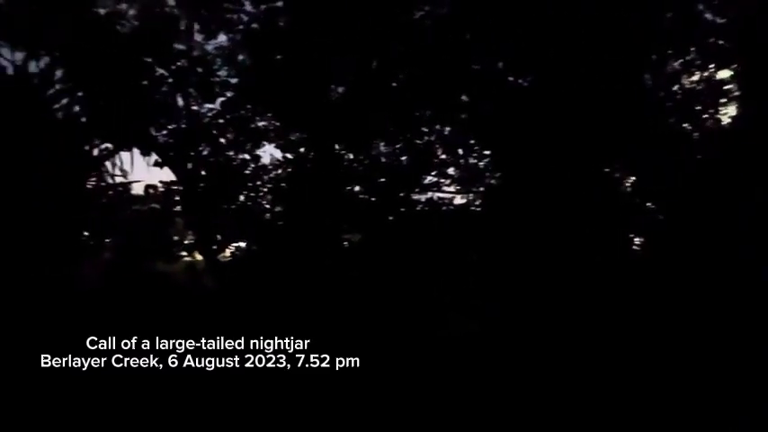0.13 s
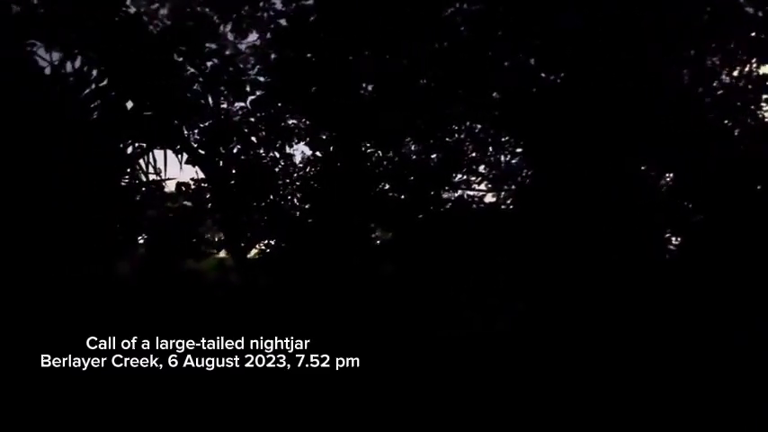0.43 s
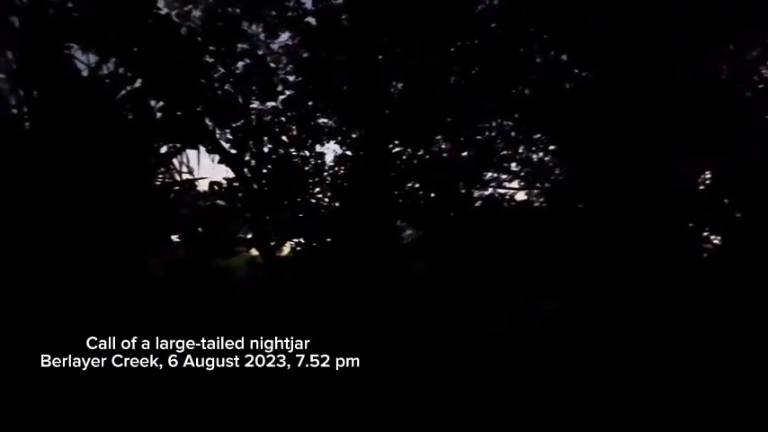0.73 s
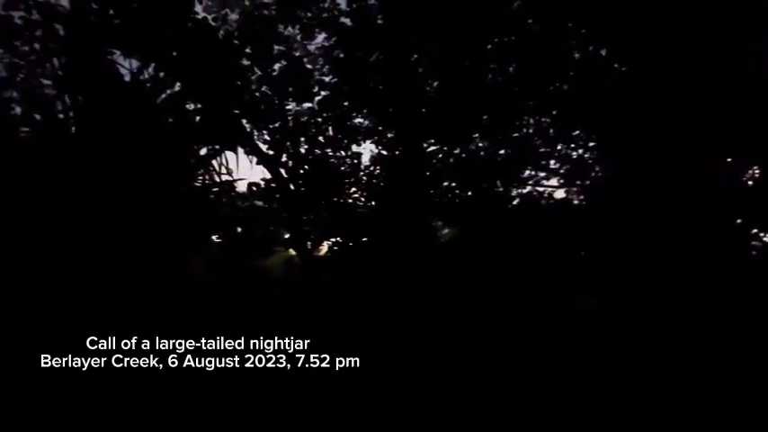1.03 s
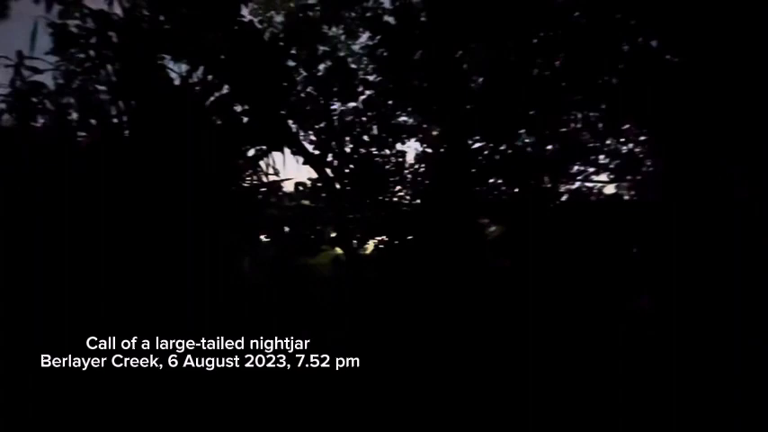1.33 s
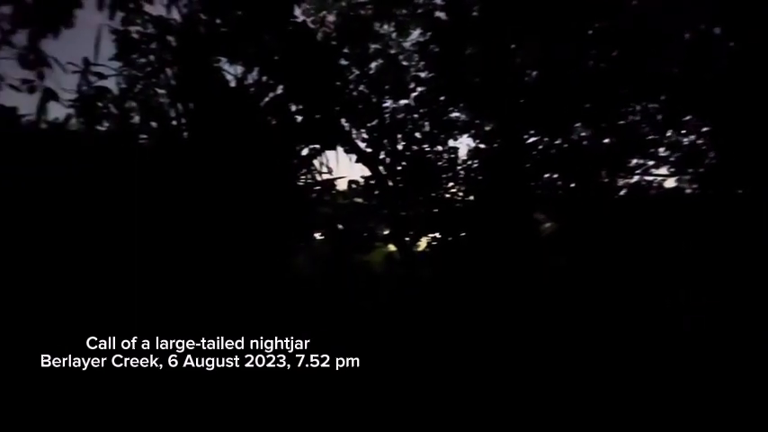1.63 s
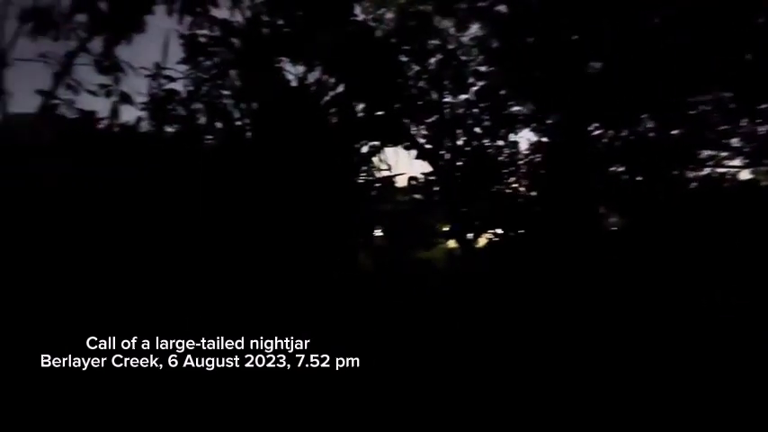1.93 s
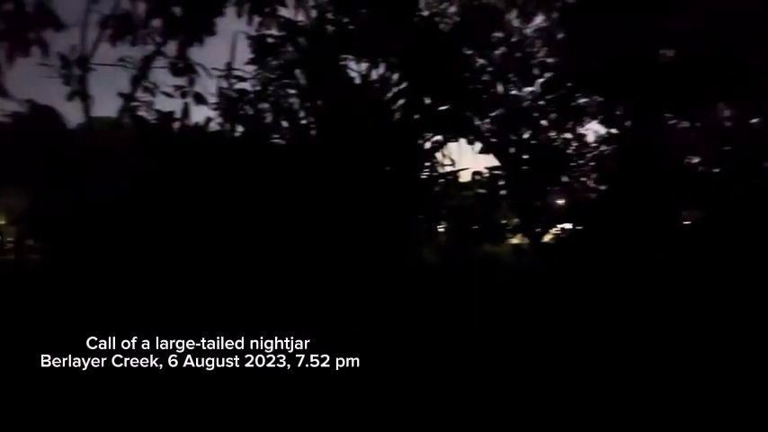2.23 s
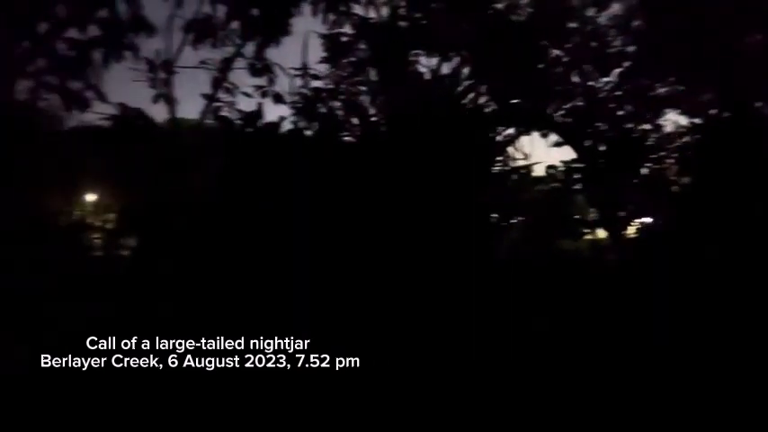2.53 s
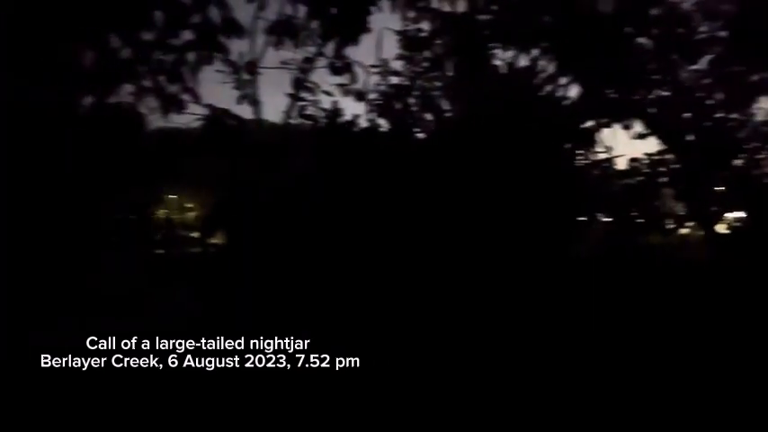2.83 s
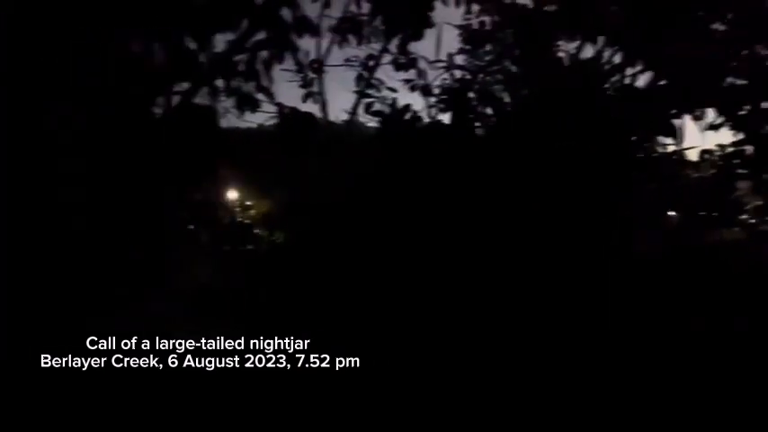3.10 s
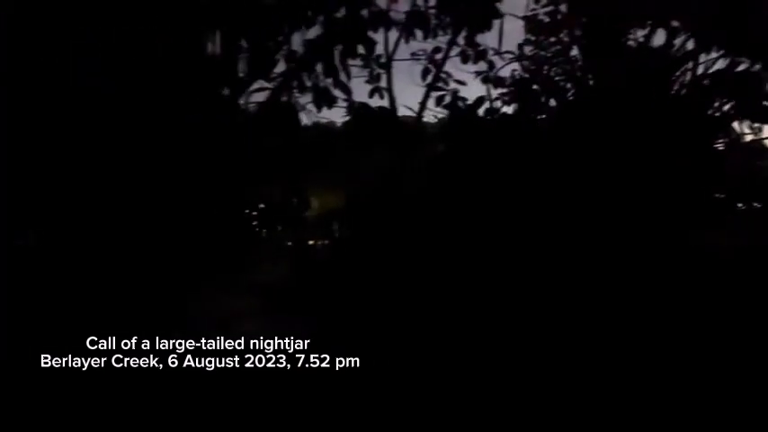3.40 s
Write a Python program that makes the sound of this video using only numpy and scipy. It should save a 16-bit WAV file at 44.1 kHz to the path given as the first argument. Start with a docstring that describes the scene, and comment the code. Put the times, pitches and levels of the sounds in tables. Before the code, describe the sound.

A nearby nightjar knocks twice, early and again after a second, echoing among trees; a frog creaks briefly beforehand. Deep engine throb and far traffic continue, with faint insects, through a handheld phone outdoors at dusk.

```python
"""A wood at dusk near water: a nightjar close by knocks twice, and fainter knocks fall around it.
Each knock is a falling whistle; the close ones turn to a purr. A frog creaks once, as clicks ringing modes.
Crickets rasp in overlapping phrases of pulsed noise, amid faint rustles; a cicada chorus hisses high up.
A big slow engine throbs as low wavering lines over the shaped noise of far traffic.
A hand-held phone with two ports hears it all through the scatter of the wood; a finger taps its case once."""
import sys
import numpy as np
from scipy import signal
from scipy.fft import rfft, irfft
from scipy.io import wavfile
from scipy.ndimage import uniform_filter1d

SR = 44100
rng = np.random.default_rng(int(sys.argv[2]) if len(sys.argv) > 2 else 0)


def unload_wav(signal):
    """Save mono or channel-first audio to the path in sys.argv[1] as 16-bit WAV at rate SR, clipped to [-1, 1]."""
    wavfile.write(
        sys.argv[1],
        SR,
        np.round(np.clip(np.atleast_2d(signal).T, -1, 1) * 32767).astype(np.int16),
    )


N = 156996

# Nightjar knocks, close and faint: start_s, level_db, pitch_factor, purr_share (0-1)
KNOCKS = [(.685, -15.5, 0.99, 0.86), (1.351, -16.5, 0.99, 1), (.300, -38, 0.95, 0.1),
          (1.085, -36.5, 0.9, 0), (1.840, -37, 0.99, 0)]
# Shape of one knock, a falling chop then uneven puffs: time_s, pitch_hz (before the factor), relative_level_db
KNOCK_SHAPE = [(0, 1950, -21), (.003, 1964, -8), (.008, 1670, -5), (.012, 1488, 1.5), (.019, 1101, -5),
               (.025, 883, -7.5), (.031, 702, -12), (0.035, 664, -29), (.041, 720, -5), (.048, 832, -5),
               (.062, 854, -8), (.069, 812, -26), (.082, 791, -12), (0.093, 854, -6), (.099, 830, -20),
               (.105, 802, -3.5), (.114, 820, -28), (.124, 736, -14), (0.135, 865, -8.5), (.143, 842, -7),
               (.150, 780, -32), (.159, 820, -14), (.166, 804, -24), (.174, 780, -40)]
OCTAVE_DB, OCTAVE_FADE_S = -12, 0.088
PURR_FROM_S, PURR_ROUGH_HZ, PURR_ROUGH_DB = 0.045, 45, 2.5

# Clicks of the frog's creak: start_s, relative_peak_db, brightness_db_per_octave
FROG_CLICKS = [(0.3335, -15.5, -4), (0.3420, -19, -6), (0.3540, -14, -6), (0.3640, -17, 5),
               (0.3682, -10.5, 5), (0.3748, -11.5, -9), (0.3864, -9.5, 1), (0.4064, -7, 2), (0.4182, -7, 0),
               (0.4272, -12, -13), (0.4400, -20, -14), (0.4520, -22, -10), (0.4610, -30, 3)]
# Modes that each click rings: pitch_hz, relative_level_db, t60_s
FROG_MODES = [(1400, -7, .020), (1880, -10, .010), (2180, -3, .015), (2480, -1, .014), (2640, -6, .009),
              (2820, -1, .015), (3050, -5, .011), (3350, -12, .008), (3850, -20, .008)]
FROG_RISE_S, FROG_DB = 0.0009, -5.5
FROG_WET_DB = -7  # further gain on the way into the wood

# Modes of the tapped case: pitch_hz, relative_level_db, t60_s
TAP_MODES = [(480, -5, .010), (780, 0, .011), (1100, -2, .009), (1500, -10, .005), (2200, -18, .005),
             (2900, -18, .005), (3700, -19, .005)]
TAP_S, TAP_RISE_S, TAP_LEFT_DB, TAP_RIGHT_DB = 2.7564, 0.0014, -20, -14

# Cricket phrases, then one low, wide rustle as the last row:
# start_s, length_s, pitch_hz, width_hz, level_db (before swell and pulse)
CRICKETS_AND_RUSTLE = [(-.3, 0.35, 4630, 170, -59), (0.45, 0.62, 4730, 200, -61.5),
                       (0.696, 0.6, 4990, 180, -64.5), (1.537, 0.45, 4730, 160, -61),
                       (1.846, 0.49, 4970, 143, -61), (2.522, 0.5, 4760, 190, -61.5),
                       (2.9, 0.58, 4950, 140, -71), (3.402, 0.64, 4670, 170, -58.5),
                       (1.933, 0.57, 3560, 553, -61.5)]
# A faint airy rustle, perhaps leaves or a hand: start_s, length_s, centre_hz, width_hz, level_db (as above)
AIRY_RUSTLE = [(0.154, .45, 5400, 1110, -63)]
CRICKETS = CRICKETS_AND_RUSTLE[:-1]
RUSTLES = CRICKETS_AND_RUSTLE[-1:] + AIRY_RUSTLE
PULSES_HZ = 78

# Low firing lines of the engine: pitch_hz
ENGINE_LINES = [50., 59.15, 62.5, 75., 87.5]
# Mean level of each of those lines: rms_db (before waver and beat fade)
ENGINE_LEVELS = [-31.5, -24, -23, -29.5, -29.5]
# Gain of the two close lines that beat: time_s, gain_db
BEAT_FADE = [(0, 2), (2.3, 0), (2.6, -9), (2.9, -3), (3.25, 0), (3.56, -4.5)]
ENGINE_WAVER_DB = 0.8
IN_STEP_S = 0.61  # a moment when the lines swell together

# Spectrum of the far traffic: frequency_hz, relative_density_db (per hertz)
TRAFFIC = [(20, -47), (32, -17), (48, -3), (62, -1), (80, -3.5), (110, -12.5), (170, -15), (260, -23),
           (400, -28), (900, -34), (1500, -44), (1750, -49), (2600, -59.5), (3100, -54.5), (4000, -62.5),
           (4800, -55.5), (5600, -68.5), (6800, -56), (7400, -67), (8000, -86), (14000, -94)]
# Spectrum of the cicada chorus: frequency_hz, relative_density_db (per hertz)
CICADAS = [(6500, -61), (7400, -8.5), (8200, -14), (9100, 2.5), (10200, -5.5), (11500, -9.5),
           (13000, -15.5), (13900, -29)]
TRAFFIC_DB, CICADAS_DB = -20.5, -40  # rms at the ports, before their colour

# Echoes from big trunks: delay_s, left_db, right_db (relative to the leaf scatter)
TRUNKS = [(.009, -5, -2), (0.02, -13, -16), (0.034, -11, -10.5), (0.046, -14, -14), (0.073, -18, -23),
          (.096, -30, -26), (.13, -27, -25)]
WOOD_T60_S, WOOD_FIRST_S, TRUNK_BLUR_S = 0.54, 0.0021, 0.0022
WOOD_DB = 1.5  # bird send into the wood
WOOD_LIKE = 0.46  # share of scatter power common to both ports
WOOD_GRAIN_DB, WOOD_BASS_HZ = 2.5, 1215

# The phone's two ports: frequency_hz, left_minus_right_db, left_lead_rad, background_likeness (limited to 0-1)
PORTS = [(60, 0.7, 0, 1), (129, 0.3, 0.4, 0.96), (259, 1, 0.05, 0.82), (378, 2.5, 1.23, 0.39),
         (494, 1, -1.25, 0.46), (770, -1.5, -2, 0.64), (1540, -3.5, -1.5, 0.4), (1630, -4.5, -2, 1),
         (1850, 4.5, 0.9, 0.26), (2370, 1.5, -0.24, 0.45), (4320, 5, 1.5, 0.5), (4900, 6, 1, 0.4),
         (5500, 1.5, -1, 0.4), (6760, 3, -2, 0.4), (7400, 4, -2.5, 1), (7710, -3.5, -3, 0.92),
         (8010, -0.5, -3, 1.05), (8915, 0, -3.5, 0.94), (10360, -0.5, -5.0, 0.93), (11100, 0, -7, 0.98),
         (13000, 0, -5.5, 1)]
TOP_HZ = 13650


def undb(db):
    """Decibels to amplitude gain."""
    return 10 ** (np.asarray(db) / 20)


def level(x, db):
    """Set the rms level."""
    return x * undb(db) / np.sqrt(np.mean(x ** 2))


def walk(rate):
    """Random control of unit spread: values held at about this rate (Hz), then smoothed twice."""
    hold = int(SR / rate)
    steps = np.repeat(rng.standard_normal(N // hold + 1), hold)
    x = uniform_filter1d(uniform_filter1d(steps, hold), hold)[:N]
    return x / x.std()


def on_hz(table, col):
    """A table column at every FFT bin, interpolated along log frequency."""
    tab = np.array(table)
    bins_hz = np.arange(N // 2 + 1) * SR / N
    return np.interp(np.log(bins_hz + 1), np.log(tab[:, 0]), tab[:, col])


def share_noise(both, own, like):
    """Mix common and own noise so that the share of common power is like."""
    return np.sqrt(like) * both + np.sqrt(1 - like) * own


def ring(blows, modes, rise):
    """Soft blows ring decaying modes, each with slightly different levels, pitches and phases."""
    out, t = np.zeros(N), np.arange(2000) / SR
    hz, db, t60 = np.array(modes).T[:, :, None]
    chances = rng.standard_normal((len(blows), 3, len(modes), 1))
    for (at, peak, bright), chance in zip(blows, chances):
        mode_db = db + bright * np.log2(hz / hz.mean()) + 1.5 * chance[0]
        mode_hz = hz * (1 + .015 * chance[1])
        tones = np.cos(2 * np.pi * mode_hz * (t - rise) + .3 * chance[2])
        decay = np.exp(-np.log(1000) * t / t60)
        body = (undb(mode_db) * tones * decay).sum(axis=0)
        body = body * np.sin(np.pi / 2 * np.clip(t / rise, 0, 1)) ** 2
        out[int(at * SR):][:len(t)] += undb(peak) * body / np.abs(body).max()
    return out


def nightjars():
    """A whistle drops fast and dips; in close knocks it purrs on, rough and low, with some octave."""
    out, t = np.zeros(N), np.arange(N) / SR
    shape_s, shape_hz, shape_db = np.array(KNOCK_SHAPE).T
    for start, db, pitch, purr in KNOCKS:
        wobble, shake = walk(120), walk(150)
        u = t - start
        late = np.clip((u - PURR_FROM_S) / 0.015, 0, 1)
        hz = pitch * np.interp(u, shape_s, shape_hz) + PURR_ROUGH_HZ * late * wobble
        phase = 2 * np.pi * np.cumsum(hz * (u > 0)) / SR
        share = 1 - (1 - purr) * np.clip(u / 0.046, 0, 1)
        puffs_db = np.interp(u, shape_s, shape_db, left=-200, right=-200)
        env = undb(db + puffs_db + PURR_ROUGH_DB * late * shake) * share
        octave_rise = np.clip((u - .025) / 0.026, 0, 1)
        octave_fade = np.exp(-np.maximum(u - .06, 0) / OCTAVE_FADE_S)
        octave = undb(OCTAVE_DB) * octave_rise * octave_fade * np.sin(2 * phase)
        out += env * (np.sin(phase) + octave)
    return out


def frog_creak():
    """A run of clicks, each ringing the same short modes with its own brightness."""
    return undb(FROG_DB) * ring(FROG_CLICKS, FROG_MODES, FROG_RISE_S)


def finger_tap():
    """One soft blow rings the case and reaches both ports through it, louder on the right."""
    return ring([(TAP_S, 0, 0)], TAP_MODES, TAP_RISE_S) * undb([[TAP_LEFT_DB], [TAP_RIGHT_DB]])


def pulsed_bands(phrases):
    """Bands of noise that swell, pulse, flicker and fade."""
    out, t = np.zeros(N), np.arange(N) / SR
    bins_hz = np.arange(N // 2 + 1) * SR / N
    pulse = 1 + 0.21 * np.sin(2 * np.pi * PULSES_HZ * t)
    for start, length, hz, width, db in phrases:
        bell = np.exp(-((bins_hz - hz) / width) ** 2)
        band = irfft(rfft(rng.standard_normal(N)) * bell, N)
        swell = np.sin(np.pi * np.clip((t - start) / length, 0, 1)) ** .5
        out += level(band, db) * swell * pulse * undb(2.3 * walk(19))
    return out


def crickets():
    """Rasping phrases: narrow, pulsed bands of noise."""
    return pulsed_bands(CRICKETS)


def rustles():
    """Faint rustles: wider bands of noise with the same pulse."""
    return pulsed_bands(RUSTLES)


def wood(x):
    """Dense grainy scatter from leaves and blurred echoes from clumps of trunks, weak in the bass."""
    t = np.arange(SR) / SR
    fade = np.exp(-np.log(1000) * t / WOOD_T60_S) * (t > WOOD_FIRST_S)
    grain = undb(WOOD_GRAIN_DB * walk(146.7)[:SR])
    both, left, right = rng.standard_normal((3, SR)) * fade * grain
    out = []
    for port, own in enumerate((left, right)):
        response = share_noise(both, own, WOOD_LIKE)
        response = response / np.sqrt(np.sum(response ** 2))  # unit energy
        for row in TRUNKS:
            blur = np.exp(-((t - row[0]) / TRUNK_BLUR_S) ** 2)
            clump = rng.standard_normal(SR) * blur
            response += level(clump, row[1 + port]) / np.sqrt(SR)
        out.append(signal.fftconvolve(x, response)[:N])
    return signal.lfilter(*signal.butter(3, WOOD_BASS_HZ, "high", fs=SR), out)


def engine():
    """Low firing lines waver a little in level and phase; two close ones beat."""
    t = np.arange(N) / SR
    fade = np.interp(t, *np.array(BEAT_FADE).T)
    out = np.zeros(N)
    for hz, db in zip(ENGINE_LINES, ENGINE_LEVELS):
        beats = 55 < hz < 65
        gain = np.sqrt(2) * undb(db + ENGINE_WAVER_DB * walk(2.27) + fade * beats)
        out += gain * np.cos(2 * np.pi * hz * (t - IN_STEP_S) + 0.38 * walk(1.154))
    return out


def wide_noise(table, db, flicker_db):
    """A broad background sound: coloured, flickering noise partly shared by both ports."""
    like = np.clip(on_hz(PORTS, col=3), 0, 1)
    both, left, right = rfft(rng.standard_normal((3, N)) * undb(flicker_db * walk(15)))
    shape = undb(on_hz(table, col=1))
    pair = [irfft(shape * share_noise(both, own, like), N) for own in (left, right)]
    return level(np.array(pair), db)


def far_traffic():
    """Low-heavy noise, almost steady."""
    return wide_noise(TRAFFIC, TRAFFIC_DB, flicker_db=0.1)


def cicada_chorus():
    """High hissing noise that flickers slightly."""
    return wide_noise(CICADAS, CICADAS_DB, flicker_db=0.78)


def ports(left, right):
    """The phone splits level and phase between its ports, half to each in opposite senses."""
    tilt = undb(on_hz(PORTS, col=1) / 2) * np.exp(.5j * on_hz(PORTS, col=2))
    return np.array([irfft(rfft(left) * tilt, N), irfft(rfft(right) / tilt, N)])


def scene():
    """All sources at the two ports; the engine and the tap skip the port colour."""
    birds = nightjars()
    soft = crickets() + rustles()
    frog = frog_creak()
    near = birds + frog + soft
    echo = wood(undb(WOOD_DB) * birds + undb(FROG_WET_DB) * frog + soft)
    tap = finger_tap()
    far = far_traffic() + cicada_chorus()
    return ports(*(near + echo + far)) + engine() + tap


def record(dry):
    """The phone opens within 6 ms and cuts the top steeply."""
    opening = np.clip(np.arange(N) / (.006 * SR), 0, 1)
    top_cut = signal.ellip(12, .2, 75, TOP_HZ, fs=SR, output="sos")
    return signal.sosfilt(top_cut, dry * opening)


dry = scene()
out = record(dry)
unload_wav(out)
```